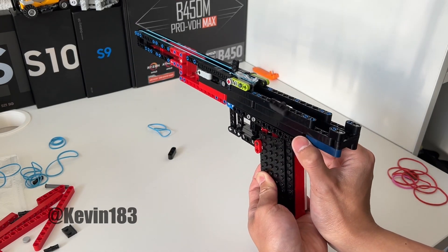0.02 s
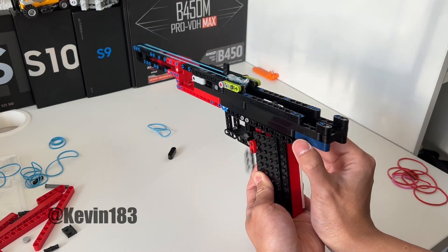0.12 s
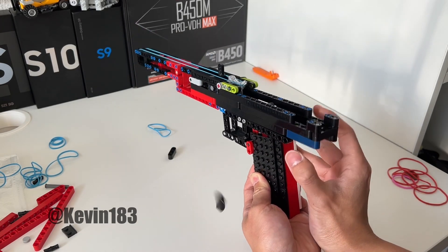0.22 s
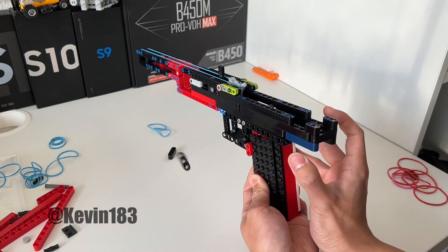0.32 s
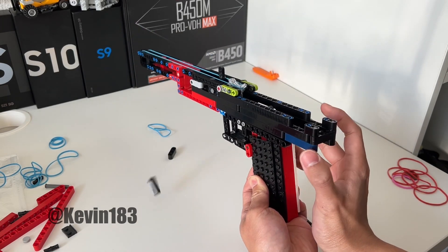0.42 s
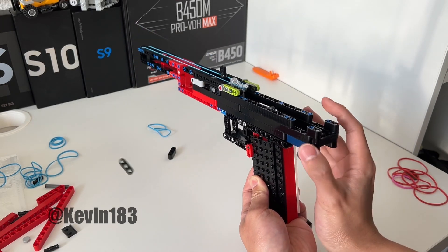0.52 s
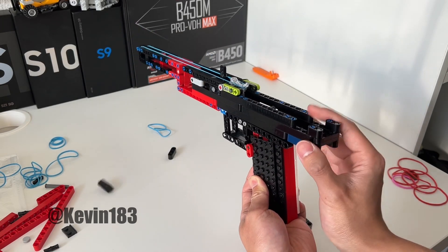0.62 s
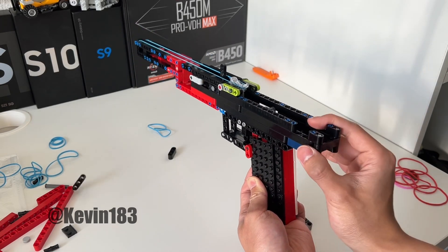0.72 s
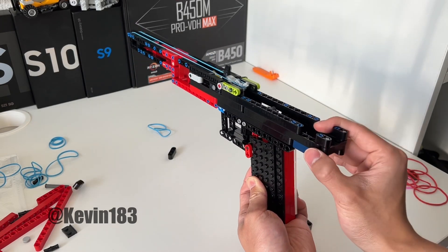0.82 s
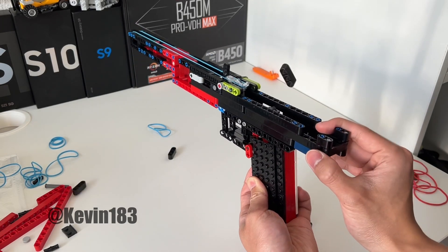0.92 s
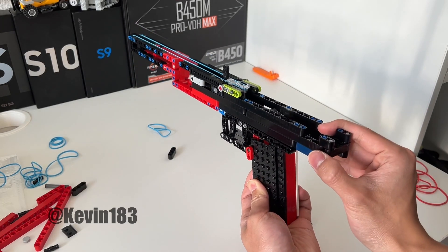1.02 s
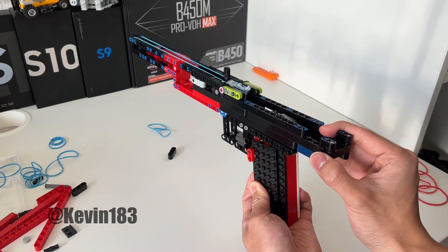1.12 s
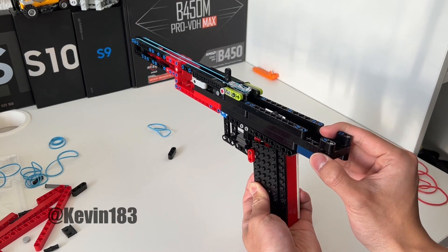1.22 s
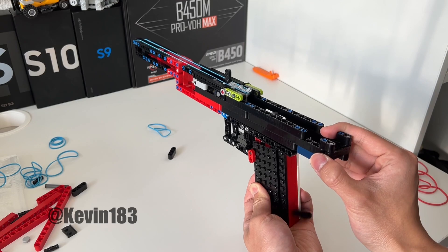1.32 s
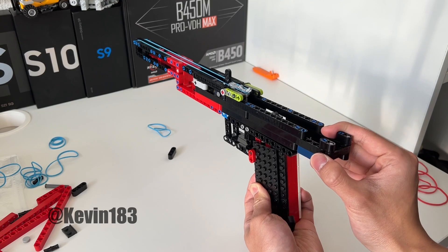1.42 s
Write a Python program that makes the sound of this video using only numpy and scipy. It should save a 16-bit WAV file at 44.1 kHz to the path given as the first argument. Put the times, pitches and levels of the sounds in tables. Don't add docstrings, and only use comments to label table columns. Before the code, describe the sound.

Close up in a small, lively room, loose plastic bricks tick, a slide slams, returns and locks with sharp clacks, then clicks rapidly over teeth before an ejected piece bounces and rolls off faintly.

```python
import sys
import numpy as np
from scipy import signal
from scipy.fft import rfft, irfft
from scipy.io import wavfile

SR = 44100
rng = np.random.default_rng(int(sys.argv[2]) if len(sys.argv) > 2 else 0)


def undo_db(level):
    steps = np.asarray(level, float) / 20
    return 10 ** steps


def file_out(sig):
    cols = np.atleast_2d(sig).T
    lim = np.clip(cols, -1, 1)
    pcm = np.round(lim * 32767).astype(np.int16)
    wavfile.write(sys.argv[1], SR, pcm)


N = 66150

# pitch_hz, level_db
# (per Hz)
HUM_SPECTRUM = [(20, -26.5), (40, -9.5), (65, 1.5), (110, -13), (220, -22.5), (600, -29), (2000, -36.5),
                (8000, -51)]
# pitch_hz, level_db, t60_s
ROOM_BANDS = [(156, -11, 0.48), (403, -18.5, 0.31), (790, -17, 0.26), (1204, -16, 0.34),
              (2850, -12.5, 0.29), (4850, -11, 0.34), (8800, -16, 0.23), (12000, -42.5, 0.15)]
# low_hz, high_hz
TAIL_GAP = (8900, 10200)
# pitch_hz, width_hz, depth_share
PORT_DIPS = [(9200, 980, 0.79), (9510, 1000, 1), (14600, 440, 1)]

# pitch_hz, level_db, t60_s
DESK_THUD = [(185, 3.5, 0.074), (313, 2.5, 0.037), (110, 2, 0.055)]
# pitch_hz, level_db, t60_s
SLAM_THUD = [(190.4, 7.5, 0.098), (302, -6, 0.15), (125, 0.5, 0.2), (60, 1, 0.24)]
# pitch_hz, level_db, t60_s
RETURN_THUD = [(176.2, 3, 0.088), (306, -5, 0.28), (128, -8.5, 0.027)]

# start_s, peak_db, tick_db, thud_db
GRIP_HITS = [
    (.072, -54, -42, -36),
    (.134, -53.5, -39.5, -22),
]
# pitch_hz, level_db, t60_s
GRIP_MODES = [(800, -6, 0.019), (1420, -0.5, .03)]
# start_s, peak_db, tick_db, thud_db
FAR_HITS = [
    (1.3265, -33.5, -44, -60),
    (1.431, -43, -44.5, -38),
]
# pitch_hz, level_db, t60_s
FAR_MODES = [(1690, -9, .02), (1895, 0, .03), (2270, -9, .02), (2900, -11, .012), (3800, -11, .012),
             (4500, -14, .01)]
# start_s, peak_db, tick_db, thud_db
ROLL_HITS = [
    (1.152, -34, -23, -51),
    (1.2, -39, -16, -47),
]
# pitch_hz, level_db, t60_s
ROLL_MODES = [(960, -11.5, .02), (1390, -8, .03), (2620, -3, .025), (4140, 11, .03)]
# start_s, peak_db, tick_db, thud_db
BOUNCE_HITS = [
    (1.1690, -23, -4.5, -48),
]
# pitch_hz, level_db, t60_s
BOUNCE_MODES = [(1450, -7, .035), (2640, 0, .02), (2800, -1, .018), (3550, -17, .03), (4200, -15, .07),
                (5200, -15, .03)]
# start_s, peak_db, tick_db, thud_db
SOFT_HITS = [
    (.0308, -32, 13.5, -54),
    (.0378, -36, 5, -57),
    (.1361, -36, 8, -42),
    (.1895, -33.5, -1, -52.5),
]
# pitch_hz, level_db, t60_s
SOFT_MODES = [(1817, -14.5, 0.026), (2470, -9.5, .015), (3046, -5.5, .012), (4830, -6, .008),
              (6020, -10, .008), (7500, 3, .01)]
# start_s, peak_db, tick_db, thud_db
TICK_HITS = [(.8555, -20, -11, -30), (.8640, -23, 13.5, -36), (1.0124, -23, -5, -48), (1.051, -20, 4, -61),
             (1.0692, -26.5, 21, -56), (1.072, -22.5, 3.5, -51), (1.176, -25, -1, -54.5),
             (1.229, -32, -7, -36)]
# pitch_hz, level_db, t60_s
TICK_MODES = [(1320, -21, .03), (2660, -8.5, .02), (3620, -0.5, .015), (5400, -8, .006), (6300, -2, .008),
              (7800, 5.5, .008)]

# start_s, stop_s, level_db
SCRAPES = [
    (0.196, 0.227, -27.5),
    (0.454, 0.47, -20),
    (0.607, 0.631, -60),
    (1.049, 1.07, -23),
]
# start_s, peak_db, tick_db, thud_db
TEETH_HITS = [(.7483, -19.5, -4, -23), (.7738, -13, -18, -15.5), (.8005, -9.5, -35, -18.5),
              (.8275, -18, -31, -19), (.867, -15.5, -3, -19), (.8895, -13, -23, -16), (.903, -14, -28, -20),
              (.9372, -16.5, -18, -18), (.949, -22.5, -18.5, -24), (.9632, -17, -2, -18.5),
              (.9985, -18.5, -8, -21), (1.019, -17.5, -9, -34), (1.039, -25, -14.5, -33),
              (1.063, -21.5, -25, -17)]
# pitch_hz, level_db, t60_s
TEETH_MODES = [(490, -4.5, 0.12), (578, -1.5, 0.099), (920, 9, .05), (1750, 10.5, .04), (2086, 11.5, .04),
               (2310, 16.5, .03), (3237, 14.5, .03), (4040, 10.5, .015), (5150, 5.5, .04), (5140, 15, .02),
               (5980, 14.5, .015)]
# start_s, peak_db, tick_db, thud_db
CATCH_HITS = [
    (.6535, -9, -10, -28),
    (.658, -5, -3, -19),
]
# pitch_hz, level_db, t60_s
CATCH_MODES = [(492, -11, 0.14), (667, -34, 0.042), (940, 5.5, .055), (1140, 1.5, .04), (1820, 9.5, .035),
               (2110, 5, .03), (2310, 16.5, .03), (2930, 15, .03), (3494, 10, .025), (3900, 15.5, .02),
               (5490, 15, .02), (7930, 18, .012)]
# start_s, peak_db, tick_db, thud_db
RETURN_HITS = [
    (.469, -0.45, -7, -22),
]
# pitch_hz, level_db, t60_s
RETURN_MODES = [(452, -22, .06), (860, -25.5, .03), (1293, 4, .04), (1896, 6, .04), (2288, 8.5, .03),
                (2480, 7, .02), (3370, 12, .025), (3750, 13, .02), (5270, 12, .02), (5600, 13.5, .02),
                (8270, 0, .008)]
# start_s, peak_db, tick_db, thud_db
SLAM_HITS = [
    (.2231, -9.5, -22, -11),
    (.2247, 0.5, -9.5, -37.5),
    (.2265, -4, -20, -30),
    (.2279, -6.5, -16.5, -29),
]
# pitch_hz, level_db, t60_s
SLAM_MODES = [(532.4, -9, 0.14), (685, -11, 0.0094), (880, -12, 0.034), (1394, -1.5, 0.023),
              (1592, -8, 0.0058), (1920, 6.5, 0.024), (2110, 1, 0.004), (2254, 5.5, 0.011),
              (2510, -0.5, .014), (3480, 3, .012), (5160, -16.5, .01)]

MAX_CYCLES, ROOM_CYCLES = 28, 5


def band(x, hz, width_hz):
    return signal.lfilter(*signal.iirpeak(hz, hz / width_hz, fs=SR), x)


def wide_band(x, hz, width_hz):
    return band(band(x, hz, width_hz), hz, width_hz)


def high_pass(x, order, hz):
    return signal.sosfilt(signal.butter(order, hz, "high", fs=SR, output="sos"), x)


def fade(t, t60):
    return np.exp(-np.log(1000) * t / t60)


def peak_to_one(x):
    return x / np.abs(np.atleast_2d(x)[:2]).max()


def hum():
    hz = np.fft.rfftfreq(N, 1 / SR) + 1
    noise = rng.standard_normal(N) + 0.91 * rng.standard_normal((2, N))
    pitch_hz, level_db = np.transpose(HUM_SPECTRUM)
    tone = irfft(rfft(noise) * undo_db(np.interp(np.log(hz), np.log(pitch_hz), level_db)), N)
    return tone * undo_db(-65) / tone.std()


def room():
    t, tail = np.arange(N // 2) / SR, 0
    for hz, db, t60 in ROOM_BANDS:
        noise = rng.standard_normal((3, N // 2))
        apart = min(hz / 900, 1)
        noise = np.sqrt(apart) * noise[:2] + np.sqrt(1 - apart) * noise[2]
        tail = tail + undo_db(db - 16) * fade(t, t60) * wide_band(noise, hz, hz)
    start_s = 0.0011
    tail = tail * np.clip(t / start_s - .5, 0, 1)
    tail = signal.sosfilt(signal.ellip(6, 1, 40, 13200, fs=SR, output="sos"), tail)
    return signal.sosfilt(signal.butter(2, TAIL_GAP, "bandstop", fs=SR, output="sos"), tail)


def earlier_tick(tail):
    late = band(tail[:, int(0.24 * SR):], 5100, 9000)
    return undo_db(-21) * late / np.abs(late).max() / 10


def ring(modes, detune, cycles=MAX_CYCLES, hit=np.ones(1)):
    t, out = np.arange(4096) / SR, 0
    neighbour_db, even_share = -9, .8
    sharp_hz, sharp_cycles = 1200, 16
    for (hz, db, t60), d in zip(modes, detune):
        drive = abs(hit @ np.exp(2j * np.pi * hz * t[:len(hit)])) / np.linalg.norm(hit)
        spread = (d * [.1, 1, 1])[:, None] * min(hz / sharp_hz / 3, 1)
        trio = undo_db(np.array([0, neighbour_db, neighbour_db])) @ np.sin(2 * np.pi * hz * (1 + spread) * t)
        extra_cycles = sharp_cycles * sharp_hz / hz if cycles >= MAX_CYCLES else 0
        decay = fade(t, min(t60, (cycles + extra_cycles) / hz))
        out = out + undo_db(db) / max(drive, .2) ** even_share * trio * decay
    return out


def chatter(both, own, chatter_s, chatter_db, apart):
    t = np.arange(1024) / SR
    swell = (t / chatter_s * np.exp(1 - t / chatter_s)) ** 3
    roughness = undo_db(chatter_db + 3.99 * rng.standard_normal(1024))
    hit = (np.sqrt(1 - apart) * both + np.sqrt(apart) * own) * roughness * swell
    hit[:, 0] -= 1
    hit[2] = np.linalg.norm(hit[0]) * (t == 0)
    return hit


def knocks(events, modes, chatter_s, chatter_db, crack_db, crack_hz, low_hz, apart, pan_db, room_db,
           thud=DESK_THUD, cycles=(MAX_CYCLES, ROOM_CYCLES)):
    out, offset_s = np.zeros((3, N + 8192)), 0.00071
    t, long_t = np.arange(1024) / SR, np.arange(4096) / SR
    for when, db, tick_db, thud_db in events:
        both, own = rng.standard_normal((2, 1024)), rng.standard_normal((3, 1024))
        detune = .035 * rng.standard_normal((2, 14, 3))
        hit = chatter(both[0], own, chatter_s, chatter_db, apart)

        direct = ring(modes, detune[0], cycles[0], hit[:2].sum(0))
        rings = np.array([direct, direct, ring(modes, detune[0], cycles[1])])
        body = signal.fftconvolve(hit, rings / rings.std(1)[:, None], axes=1)
        crack = wide_band(np.pad(hit, ((0, 0), (0, 4095))), crack_hz, 2 * crack_hz)
        body = peak_to_one(peak_to_one(body) + undo_db(crack_db) * peak_to_one(crack))
        body = high_pass(body, 4, low_hz)

        tick = peak_to_one(band(both[1] * fade(t, .003), 11700, 3200))
        body[:, :1024] += undo_db(tick_db) * np.array([tick, np.roll(tick, 1), tick])
        body = body * undo_db(np.array([[pan_db / 2], [-pan_db / 2], [0]]))

        thuds = np.array([ring(thud, detune[1]), ring(thud, 4 * detune[0]), ring(thud, detune[1], ROOM_CYCLES)])
        body[:, :4096] += undo_db(thud_db) * peak_to_one(thuds) * (1 - fade(long_t, 0.058))

        i = int((when + offset_s) * SR)
        out[:, i:i + 5119] += body * undo_db(db + np.array([[0], [0], [room_db]]))
    return high_pass(out[:, :N], 2, 95)


def grip():
    return knocks(GRIP_HITS, GRIP_MODES, 0.0013, -10, crack_db=-23.5, crack_hz=2203, low_hz=565,
                  apart=0.2, pan_db=-9, room_db=3.5)


def far_bounces():
    return knocks(FAR_HITS, FAR_MODES, 0.00059, -30, crack_db=-35, crack_hz=3050, low_hz=1327,
                  apart=0.23, pan_db=-8, room_db=-0.5, cycles=(45, 24))


def rolls():
    return knocks(ROLL_HITS, ROLL_MODES, 0.0012, -21, crack_db=-5, crack_hz=2960, low_hz=700,
                  apart=0.46, pan_db=-7, room_db=6.5)


def bounces():
    return knocks(BOUNCE_HITS, BOUNCE_MODES, 0.00091, -13.5, crack_db=-42, crack_hz=4600, low_hz=1050,
                  apart=0.16, pan_db=-7, room_db=-2, cycles=(250, 24))


def soft_ticks():
    return knocks(SOFT_HITS, SOFT_MODES, .0014, -9, crack_db=-7, crack_hz=4500, low_hz=1280,
                  apart=.19, pan_db=-2, room_db=0.5)


def ticks():
    return knocks(TICK_HITS, TICK_MODES, 0.001, -9, crack_db=-11, crack_hz=5560, low_hz=1250,
                  apart=0.11, pan_db=-1.5, room_db=-1)


def slide_scrape():
    t, level = np.arange(N) / SR, 0
    for start, stop, db in SCRAPES:
        level = level + undo_db(db) * np.clip((t - start) / (stop - start), 0, 1) ** 1.7 * (t < stop)
    grit = rng.standard_normal((2, N)) * undo_db(1.8 * rng.standard_normal(N))
    return level * (band(grit, 2100, 1200) + 0.29 * band(grit, 6100, 1800))


def teeth():
    return knocks(TEETH_HITS, TEETH_MODES, 0.0023, -19, crack_db=-2.5, crack_hz=3140, low_hz=408,
                  apart=0.58, pan_db=-1.5, room_db=-2.24, cycles=(40, 12))


def catch_slam():
    return knocks(CATCH_HITS, CATCH_MODES, 0.0028, -17, crack_db=0.5, crack_hz=4170, low_hz=320,
                  apart=0.92, pan_db=-2, room_db=1, cycles=(40, 8))


def return_slam():
    return knocks(RETURN_HITS, RETURN_MODES, 0.0041, -23, crack_db=-3, crack_hz=3930, low_hz=324,
                  apart=0.76, pan_db=-5, room_db=1.06, thud=RETURN_THUD)


def slam():
    return knocks(SLAM_HITS, SLAM_MODES, 0.00049, -5, crack_db=-33, crack_hz=2590, low_hz=460,
                  apart=0.12, pan_db=-1, room_db=-3, thud=SLAM_THUD)


def scene():
    pistol = slam() + return_slam() + catch_slam() + teeth() + ticks() + soft_ticks() + grip()
    brick = bounces() + rolls() + far_bounces()
    struck = pistol + brick
    scrape = slide_scrape()
    tail = room()
    wet = signal.fftconvolve((struck[2] + scrape[0])[None], tail, axes=1)[:, :N]
    earlier = earlier_tick(tail)
    wet[:, :earlier.shape[1]] += earlier
    return struck[:2] + scrape + wet * undo_db(np.array([[-1.2], [1.2]])) + hum()


def band_limit(x):
    return signal.sosfilt(signal.butter(12, 17660, fs=SR, output="sos"), x)


def record(dry):
    difference = dry[0] - dry[1]
    side = signal.lfilter(*signal.butter(1, 260, "high", fs=SR), difference) / 2
    x = dry.mean(0) + (.5 * side + .25 * difference) * np.array([[1], [-1]])
    x[0] -= 0.28 * band(x[0], 4900, 2500)
    x = high_pass(x, 1, 45)
    for hz, width_hz, depth in PORT_DIPS:
        x = x - depth * band(x, hz, width_hz)
    x = signal.sosfilt(signal.ellip(8, .2, 80, 16300, fs=SR, output="sos"), x)
    return band_limit(x)


dry = scene()
out = record(dry)
file_out(out)
```